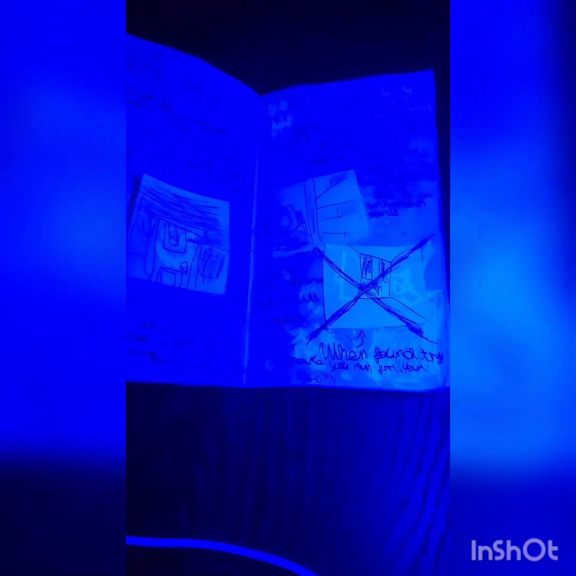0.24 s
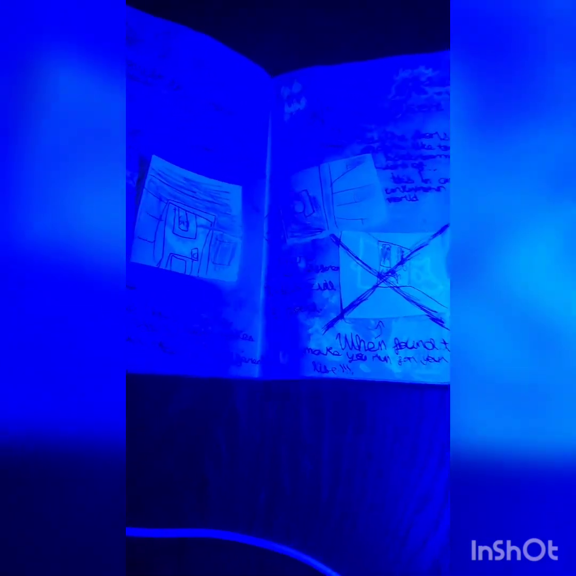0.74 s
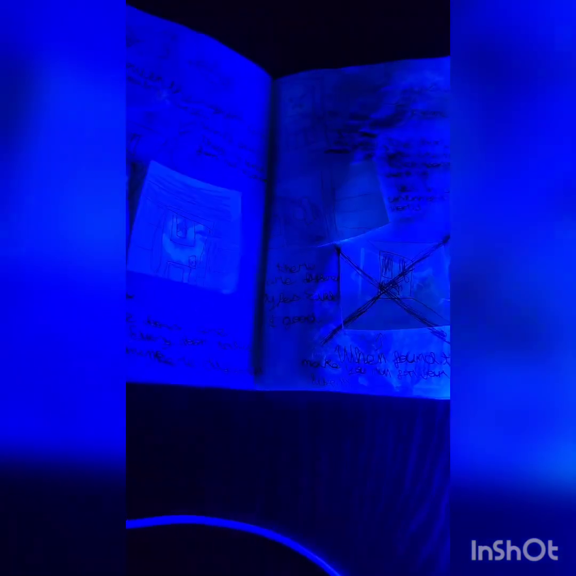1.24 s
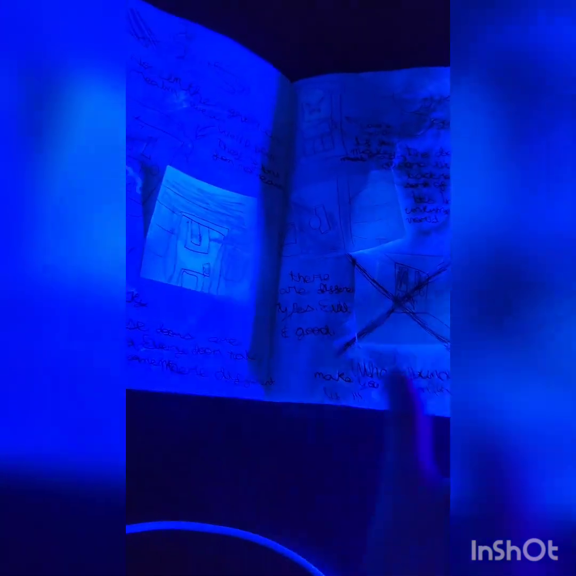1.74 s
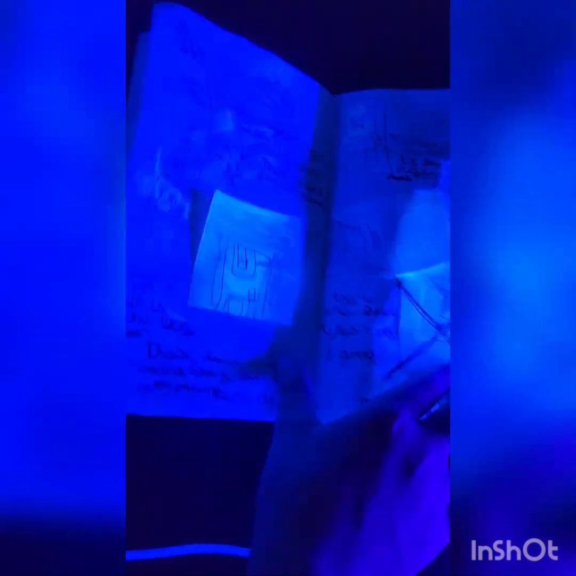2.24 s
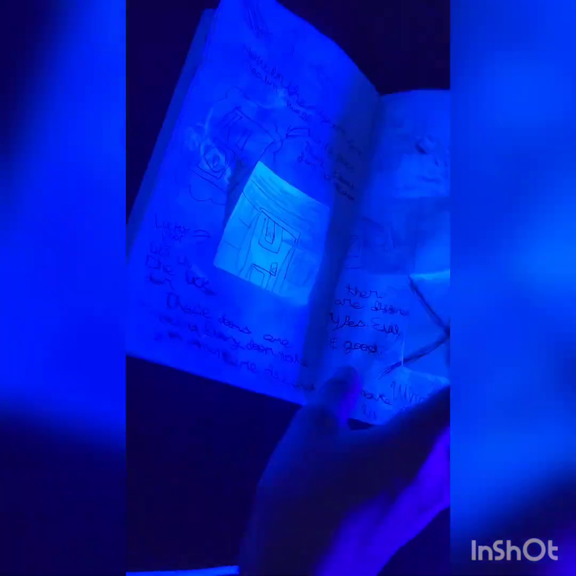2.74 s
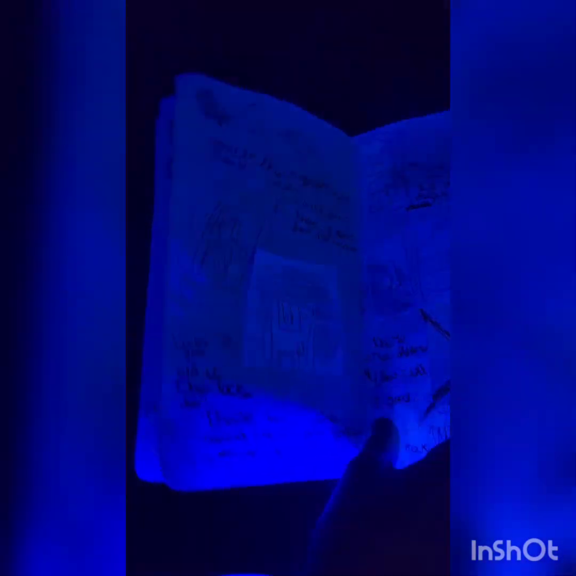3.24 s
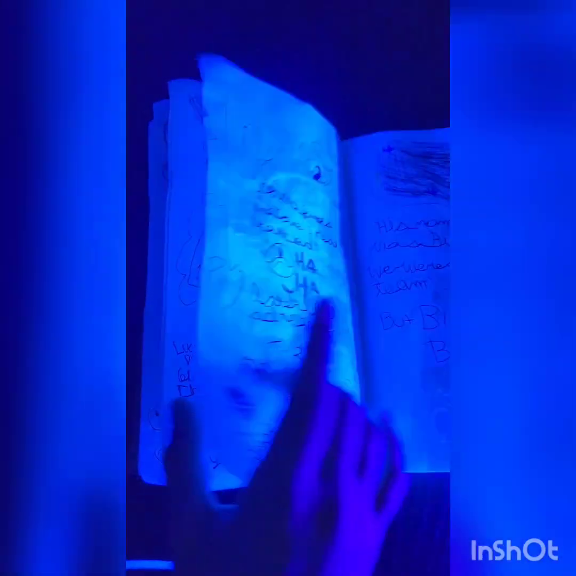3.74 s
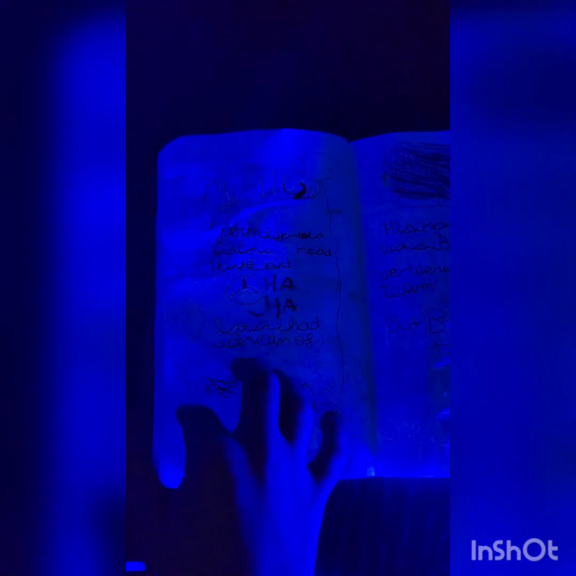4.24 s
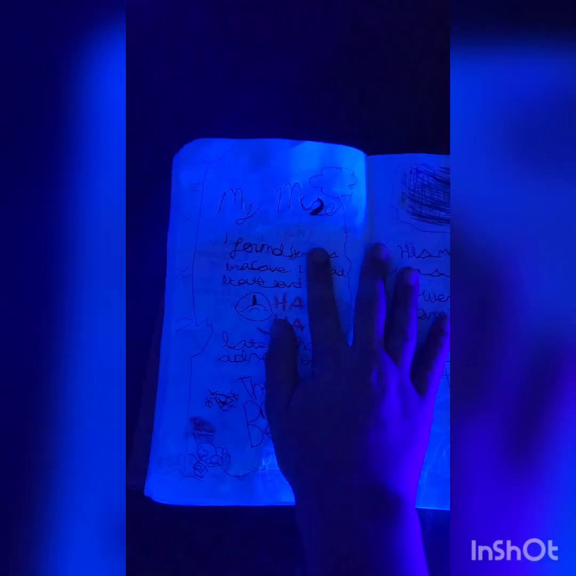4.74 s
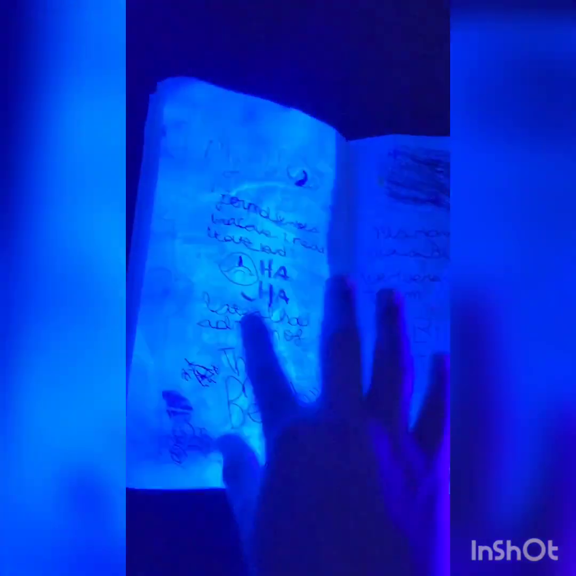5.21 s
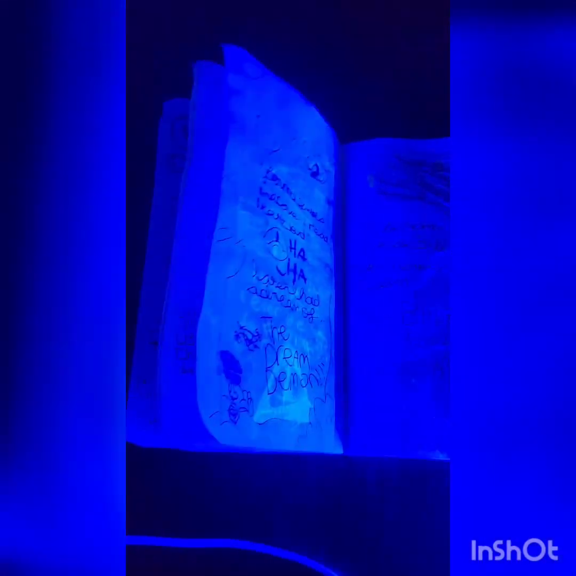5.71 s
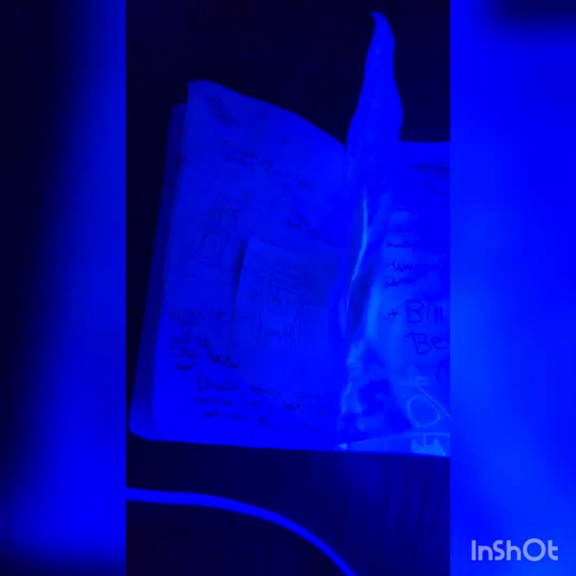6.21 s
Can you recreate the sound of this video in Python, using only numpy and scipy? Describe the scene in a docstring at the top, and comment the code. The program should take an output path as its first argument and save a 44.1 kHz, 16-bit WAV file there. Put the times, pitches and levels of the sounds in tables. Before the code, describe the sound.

A low, slightly wavering room tone opens alone. Something hard knocks and chatters near the microphone, dry and bright with short woody thuds. Heavy handmade pages are then rubbed and flipped on a table, leaning left, with crinkling, crisp creases and a soft low boom and rumble. A piercing paper snap comes past the middle; afterwards the handling thins to quiet swishes, small ticks and soft bumps in a small room.

```python
"""A thick handmade book on a table in a quiet, humming room, heard through two close microphone ports.
Over the hum, the first stiff paper snaps; then something hard nearby clacks and chatters: thuds, ringing modes, cracks.
Next a hand lifts the book, rubs and turns its pages: noise made of many slips hisses and scrapes,
and buckling creases snap and crackle. The table top booms as the book is set down, and rumbles while it is shifted.
Later the rustling and snaps grow softer, and soft bumps come near the end."""
import sys
import numpy as np
from scipy import signal
from scipy.fft import rfft, irfft, next_fast_len
from scipy.io import wavfile
from scipy.ndimage import uniform_filter1d

SR = 44100
rng = np.random.default_rng(int(sys.argv[2]) if len(sys.argv) > 2 else 0)


def gain_from_db(level_db):
    """Turn a decibel level (scalar or array-like) into a linear amplitude factor."""
    decades = np.asarray(level_db, float) / 20
    return 10 ** decades


def wav_out(sig):
    """Save sig, one row per channel (or a flat mono array), as 16-bit PCM at SR to the path in sys.argv[1]."""
    wavfile.write(sys.argv[1], SR, np.round(np.clip(np.atleast_2d(sig).T, -1, 1) * 32767).astype(np.int16))


N = 285327  # length of the sound in samples


# paper snaps: (start_s, peak_db, sheet_pitch_hz, crack_over_sheet_db, left_over_right_db)
PAPER_SNAPS = [(1.121, -38, 8100, -2, 3), (1.145, -35.5, 2270, 12, 6), (1.16, -35, 2290, 15, 9),
               (1.192, -30, 1400, 26, 8), (1.929, -45, 8000, 0, 11), (2.016, -34.5, 2680, -3, 9),
               (2.303, -28, 1165, 11, 9), (2.359, -26.5, 2720, 10, 9), (2.372, -37.5, 940, -3.5, 16),
               (2.419, -22.5, 920, 1.5, 12), (2.438, -15.5, 980, 8, 9.5), (2.45, -28, 1260, 5, 15),
               (2.487, -35.5, 940, -19, 16.5), (2.519, -26, 1620, 5, 11), (2.554, -26, 1060, 5, 14),
               (2.6, -37.5, 1030, -14, 11), (2.647, -26.5, 935, -7.5, 7), (2.67, -19.5, 1390, 5, 10.5),
               (2.702, -39, 930, -9.5, 16), (3.051, -34, 3570, -4, 3), (3.059, -26, 2280, -5, 6),
               (3.097, -34, 1360, -9, 8), (3.175, -29, 1080, 0, 5), (3.207, -29.5, 2600, -6, 4),
               (3.226, -27, 1110, -5.5, 4), (3.256, -25.5, 1560, -6.5, 1), (3.286, -18.5, 1250, 3, 5),
               (3.422, -31, 1440, -5, 2), (3.442, -22.5, 3170, -7, 3.5), (3.451, -35, 3200, 4, 4),
               (3.552, -35, 1040, -3, 0), (3.743, -47, 1830, -11, 8), (3.815, -42, 1090, -15, 19),
               (3.839, -26.5, 1800, -3, 9), (3.848, -11.5, 5700, 8.5, 5), (3.857, -29, 2620, 1, 6),
               (3.909, -35, 2380, -1, 13), (4.001, -34.5, 930, -10, 0), (4.016, -39.5, 7220, 5, 10),
               (4.264, -35, 1170, -7, 7), (4.275, -34, 5360, -9, 7), (4.295, -38.5, 900, -1, 9),
               (4.359, -32, 900, -2, 10.5), (4.394, -48, 1270, -7, 11), (4.512, -37.5, 7350, 20, 14),
               (4.554, -18, 840, 1.5, 7.5), (4.755, -22.5, 2620, 11, 6.5), (4.858, -43, 960, -4.5, 8),
               (4.942, -45, 1500, -4.5, 7), (4.993, -38, 1130, -0.5, 5), (5.072, -41, 1090, 6, 19),
               (5.12, -41, 950, -3.5, 8), (5.172, -39, 870, -2.5, 20), (5.194, -43, 880, -6, 6),
               (5.451, -38.5, 7140, 20, 13.5), (5.694, -40, 1095, -18, 8), (5.722, -47.5, 770, -11.5, 7),
               (5.927, -35, 3780, 4.5, 9.5), (6.04, -44, 2210, -23, 9), (6.13, -35, 1030, 7, 3),
               (6.151, -42.5, 1220, -18, 10), (6.198, -35.5, 730, -2, 3), (6.21, -44, 1400, -12, 4),
               (6.248, -35.5, 660, -27, 3), (6.255, -39.5, 736, -23.5, 11), (6.346, -48, 3000, -9, 8),
               (6.391, -54, 3080, -6.5, 8)]


def snaps():
    """A crease buckles: a jolt and its aftershocks ring the sheet for a few cycles under a wide crack."""
    mix = np.zeros((2, N))
    jolt = 3 * signal.unit_impulse(4000, idx=20)
    for start_s, peak_db, hz, crack_db, pan_db in PAPER_SNAPS:
        blow = jolt + burst(t60=0.018, alike=0.6, rise_s=0.0019)
        narrow = resonate(blow, hz, 0.34 * hz)
        sheet = evened(resonate(narrow, hz, 2.7 * hz))
        add(mix, start_s, peak_db, pan_db, sheet + gain_from_db(crack_db) * crack(blow))
    return mix


# colour of a sudden break: (pitch_hz, gain_db)
CRACK_COLOUR = [(200, -27), (600, -5), (1500, -4.5), (4000, -1.5), (8000, -11), (17000, -4.5)]


def crack(blow):
    """A sudden break is a very short noise spread over most pitches."""
    return coloured(blow, CRACK_COLOUR)


# colours of the fine slips, the coarse slips and the shaken sheet: (pitch_hz, gain_db)
HISS_COLOUR = [(1500, -13.5), (3000, -15), (5000, -4), (8000, -7.5), (12000, -7.5), (17000, -1.5)]
SCRAPE_COLOUR = [(800, -16.5), (1800, -10), (3000, -6), (4500, -9), (8000, -19.5), (17000, -36)]
BODY_COLOUR = [(200, -28.5), (500, -2.5), (900, 5.5), (1500, -1), (2500, -10), (5000, -54)]


def rustle():
    """Fine slips of skin and fibres hiss, coarse ones scrape, and the rarest shake the whole sheet."""
    fine = grains(per_s=900, spread_db=2.5, length_s=0.003)
    coarse = grains(per_s=400, spread_db=3.0, length_s=0.003)
    rare = grains(per_s=200, spread_db=3.5, length_s=0.0029)
    hiss = coloured(fine, HISS_COLOUR) * pressure(follows=0)
    scrape = coloured(coarse, SCRAPE_COLOUR) * pressure(follows=1)
    body = coloured(ports(rare), BODY_COLOUR) * pressure(follows=1.41)
    mix = gain_from_db(2.5) * hiss + gain_from_db(-2.0) * scrape + gain_from_db(-6.0) * body
    return mix * gain_from_db(np.array([[1.7], [-1.7]]))  # louder on the left


def grains(per_s, spread_db, length_s):
    """Noise whose loudness jumps with many small slips of unequal size, over a steady floor."""
    sizes = gain_from_db(spread_db * np.minimum(rng.exponential(1, N), 4))
    slips = (rng.random(N) < per_s / SR) * sizes
    lumps = signal.lfilter([1], [1, -np.exp(-1 / (length_s * SR))], slips)
    return (lumps + 0.66 * lumps.mean()) * rng.standard_normal((2, N))


# swells of rustling noise: strokes of hand and page, and the rattling tails of the clacks:
# (rise_until_s, fall_from_s, first_level_db, last_level_db, coarse_over_fine_db)
SWELLS = [(1.148, 1.165, -55, -57, -6.5), (1.19, 1.196, -61, -56, -6.5), (1.249, 1.431, -38, -61, 4),
          (1.492, 1.66, -64.5, -62, 9.5), (1.714, 1.895, -48, -76.5, -1), (1.928, 2.102, -68, -64.5, 1),
          (2.164, 2.181, -61, -67, 0), (2.335, 2.31, -39.5, -42.5, -2), (2.393, 2.384, -49, -54.5, 4.5),
          (2.422, 2.685, -44, -47.5, -1), (2.73, 2.885, -54.5, -51.5, -1), (2.92, 3.044, -65, -68, 1.5),
          (3.063, 3.162, -62.5, -49.5, -3), (3.184, 3.463, -47, -51, 1), (3.474, 3.565, -58, -57.5, 3),
          (3.651, 3.663, -64.5, -66.5, 1), (3.855, 3.838, -45, -30.5, 1), (3.858, 4.0, -56, -61, 2.5),
          (4.038, 4.108, -61.5, -65, -8), (4.201, 4.28, -60.5, -49.5, -7.5), (4.285, 4.386, -63, -67, 1.5),
          (4.428, 4.457, -51.5, -52.5, -3.5), (4.517, 4.562, -47, -52, -3.5),
          (4.598, 4.682, -62.5, -51.5, 2.5), (4.734, 4.779, -71, -65.5, 8),
          (4.861, 5.04, -69.5, -68.5, 4.5), (5.046, 5.209, -60, -60.5, 0), (5.239, 5.415, -52, -60.5, -14),
          (5.447, 5.57, -54, -70, -7), (5.58, 6.012, -72.5, -71.5, -0.5), (6.035, 6.113, -71, -69, 5),
          (6.13, 6.27, -72.5, -78, 13), (6.3, 6.47, -72.5, -72.5, 9)]


def pressure(follows):
    """Gain of all swells: each rises, may slide in level, and falls; the shortest overlap rise and fall."""
    rise_db_per_s, fall_db_per_s = 700.5, 483
    t, power = np.arange(0, N + 64, 64) / SR, 0  # one point every 64 samples
    for rise_until, fall_from, first_db, last_db, coarse_db in SWELLS:
        slide_db = np.interp(t, [rise_until, fall_from], [first_db, last_db])
        before_db = rise_db_per_s * np.maximum(rise_until - t, 0)
        after_db = fall_db_per_s * np.maximum(t - fall_from, 0)
        level_db = slide_db + follows * coarse_db - before_db - after_db  # follows: dB per dB of coarseness
        power = power + gain_from_db(level_db) ** 2
    return np.interp(np.arange(N) / SR, t, np.sqrt(power))


def patchy(x):
    """Fibres differ from spot to spot: narrow bands swell and sink at random."""
    z = signal.stft(x, nperseg=512)[2]
    patches = uniform_filter1d(rng.standard_normal(z.shape[1:]), size=4, axis=0)  # smooth over pitch
    patches = uniform_filter1d(patches, size=7, axis=1)  # smooth over time
    return signal.istft(z * gain_from_db(1.75 * evened(patches)), nperseg=512)[1][:, :N]


# pitches of small patches of paper: (pitch_hz)
PATCH_HZ = [810, 1130, 1700, 2500, 3600]


def crackle(per_s=16, spread_db=3.0):
    """Small creases give at random, louder as the rustling swells, each patch with its own pitch."""
    bend, mix = pressure(follows=0.84), np.zeros((2, N))
    for hz in PATCH_HZ:
        sizes = gain_from_db(spread_db * np.minimum(rng.exponential(1, N), 3))
        gives = (rng.random(N) < per_s / SR) * sizes
        tick = resonate(burst(t60=0.018, alike=0.44, rise_s=0.00042), hz, 0.55 * hz)
        mix += signal.oaconvolve((gives * bend)[None], tick / abs(tick).max(), axes=1)[:, :N]
    return gain_from_db(3.0) * mix * gain_from_db(np.array([[2.5], [-2.5]]))


# a narrow band of noise, silent because its end precedes its start: start_s, end_s, pitch_hz, width_hz, level_db
SILENT_BAND = (5.06, 5, 3500, 450, -60)


def whistle(fade_s=0.03):
    """A narrow band of noise, silent because its end precedes its start and the fade stays at zero."""
    start, end, hz, width, level_db = SILENT_BAND
    t = np.arange(N) / SR
    fade = np.clip(np.minimum(t - start, end - t) / fade_s + 1, 0, 1)
    return gain_from_db(level_db) * hum(hz, width) * fade


# hard clacks: (start_s, peak_db, thud_pitch_hz, thud_over_ring_db, strike_place from -1 to 1)
HARD_CLACKS = [(1.233, -1.5, 730, 10.5, 0.23), (1.238, -10.5, 1391, 12, .38), (1.249, -23.5, 703, 15, .3),
               (1.264, -34.5, 709, 16.5, .3), (1.281, -12, 707, 11, .3), (1.299, -23, 634, 18.5, .38),
               (1.31, -23.5, 528, 16, .3), (1.376, -30.5, 563, 3, 0.33), (1.534, -7, 1350, 16.5, 0.75),
               (1.536, -13, 731, 20, .3), (1.543, -11.5, 1277, 9.5, -0.39),
               (1.570, -12.5, 450, -6.5, -0.75), (1.579, -16, 456, -15, -0.71),
               (1.586, -21, 1200, -28, -0.13), (1.635, -22.5, 398, -14, -1.1),
               (1.642, -22.5, 1230, -22, -1.1), (1.671, -14.5, 447, 15.5, .45),
               (1.685, -13.5, 604, 1.4, 0.49), (1.694, -14, 695, -9.5, 0.69), (1.702, -12, 556, -1, 0.39),
               (1.707, -25, 1304, -7.5, 0.68)]
# modes of the hard object: (pitch_hz, width_hz, gain_db, gain_toward_strike_place_1_db)
OBJECT_MODES = [(2247, 280, -3, 1), (2617, 150, -4.5, -7), (4380, 410, -10, -2), (5330, 640, -13.5, 1.5),
                (6030, 300, -14.5, -4.5), (7710, 370, -22.5, 4.5)]


def clacks():
    """Each blow: a few low cycles, the object's modes as the strike place favours them, and a wide crack."""
    mix = np.zeros((2, N))
    for start_s, peak_db, hz, thud_db, place in HARD_CLACKS:
        crack_db = 14.5 + 0.4 * peak_db + 0.32 * thud_db  # more crack in harder, fuller blows
        blow = burst(t60=0.031, alike=0.4, rise_s=0.0014)
        t = np.arange(blow.shape[1]) / SR
        fade = gain_from_db(-60 * t * hz / 9)  # 60 dB down after nine cycles
        thud = np.sin(2 * np.pi * hz * t) * np.minimum(t / 0.00076, 1) * fade
        place = np.clip(place, -1, 1)
        ring = 0
        for mode_hz, width, gain_db, lean_db in OBJECT_MODES:
            mode = resonate(resonate(blow, mode_hz, width), mode_hz, 3 * width)
            ring = ring + gain_from_db(gain_db + lean_db * place) * mode
        sound = evened(ring) + gain_from_db(thud_db) * evened(thud) + gain_from_db(crack_db) * crack(blow)
        add(mix, start_s, peak_db, 3.5, sound)
    lag_s = 0.00019  # the clacks reach the left port later
    return np.array([np.roll(mix[0], round(lag_s * SR)), mix[1]])


# soft bumps of hand and book on the table: (start_s, peak_db, pitch_hz)
SOFT_BUMPS = [(1.885, -34.5, 204), (2.458, -25.5, 77.7), (3.183, -40, 196), (3.86, -39, 149),
              (6.012, -45, 150), (6.042, -38.5, 380), (6.099, -42.5, 470), (6.199, -40.5, 344),
              (6.211, -38.5, 443), (6.274, -63, 151)]


def bumps():
    """A soft push moves the table for one or two low cycles."""
    mix, t = np.zeros((2, N)), np.arange(3000) / SR
    for start_s, peak_db, hz in SOFT_BUMPS:
        push = np.sin(2 * np.pi * hz * t) * np.minimum(t / 0.0013, 1) * gain_from_db(-60 * t * hz / 5)
        add(mix, start_s, peak_db, 2.5, np.array([push, push]))
    return mix


# low modes of the table top: (pitch_hz, width_hz, level_db)
TABLE_MODES = [(73.6, 35, 7), (97, 20, 7), (127.3, 56, -2)]


def boom():
    """The table top booms as the book is set down and rumbles on while it is shifted, alike at both ports."""
    start_s, rise_s, shift_end_s = 2.415, 0.058, 2.99
    push, t = rng.standard_normal(N), np.arange(N) / SR - start_s
    wood = 0
    for hz, width, level_db in TABLE_MODES:
        wood = wood + gain_from_db(level_db) * evened(resonate(resonate(push, hz, width), hz, width))
    after = np.maximum(t - rise_s, 0)
    set_down = gain_from_db(-31 - 60 * after / 0.44)  # loses 60 dB in 0.44 s
    shifted = gain_from_db(-41 - 60 * after / 2.4)  # fades at 60 dB in 2.4 s until the shifting ends
    shifted = shifted * np.clip((shift_end_s - start_s - t) / rise_s, 0, 1)
    return evened(wood) * np.clip(t / rise_s, 0, 1) ** 2 * np.hypot(set_down, shifted)


# how long the room's echo lasts: (pitch_hz, time_to_fall_60_db_s)
ECHO_LENGTH = [(300, 0.34), (790, 0.33), (2090, 0.35), (5510, 0.31)]


def room(x):
    """Walls return sparse taps of random sign, each band dying at its own speed."""
    taps = np.zeros((2, SR // 2))
    at = np.arange(180, SR // 2 - 20, 20)
    at = at + rng.integers(0, 20, (2, len(at)))
    np.put_along_axis(taps, at, rng.choice([-1., 1.], at.shape), 1)
    hz, t, z = signal.stft(ports(taps), SR, nperseg=256)
    fade = gain_from_db(-60 * t / read(ECHO_LENGTH, hz)[:, None])
    tail = signal.istft(z * fade, SR, nperseg=256)[1]
    return signal.fftconvolve(x.mean(0)[None], tail / np.linalg.norm(tail[0]), axes=1)[:, :N]


# colour of room tone and microphone hiss: (pitch_hz, gain_db)
AIR_COLOUR = [(25, 2), (60, -5.5), (150, -17.5), (240, -27), (340, -22.5), (600, -24.5), (750, -40.5),
              (1150, -33.5), (1300, -45), (2200, -43), (4000, -47), (6500, -44), (9000, -47.5),
              (16500, -50)]
# fuzzy hums of the house: (pitch_hz, width_hz, level_db)
HOUSE_HUMS = [(88, 37, -59), (137.5, 24.7, -62), (196.3, 15, -67.5), (344, 69, -64), (512, 160, -67),
              (1390, 71, -82.5), (4940, 150, -90)]
# a thin hum wavers: (time_s, level_db)
THIN_HUM_LEVEL = [(0, -75), (.6, -77), (1.1, -72.5), (2.1, -72.5), (4.3, -70.5), (5.7, -69), (5.85, -62.5),
                  (6.0, -70.5), (6.47, -73)]


def room_tone():
    """Steady wide noise, narrow steady hums, a thin wavering one and the deep hum."""
    wide = gain_from_db(-50.5) * coloured(rng.standard_normal((2, N)), AIR_COLOUR)
    hums = sum(gain_from_db(level_db) * hum(hz, width) for hz, width, level_db in HOUSE_HUMS)
    thin = hum(hz=1025, width=63) * curve(THIN_HUM_LEVEL)
    return (ports(wide + hums + thin) + deep_hum()) * gain_from_db(np.array([[0.6], [-0.6]]))


def hum(hz, width):
    """A fuzzy tone: noise through a steep resonance."""
    return evened(resonate(resonate(rng.standard_normal((2, N)), hz, width), hz, width))


# the deepest hum swells and fades: (time_s, level_db)
DEEP_HUM_LEVEL = [(0.06, -45), (0.36, -60.5), (0.45, -50.5), (0.72, -47.5), (0.82, -56.5), (1.5, -60.5),
                  (1.58, -52), (1.75, -60), (2.36, -61), (2.47, -42.5), (2.85, -50.5), (3.13, -62.5),
                  (3.73, -53), (4.0, -68), (4.4, -51.5), (4.8, -51), (4.99, -66), (5.19, -46), (5.37, -57),
                  (6.1, -62), (6.47, -61)]


def deep_hum(hz=48, wander_hz=6, waver_db=2.5):
    """A low tone whose pitch and level drift at random."""
    noise = rng.standard_normal((2, N))
    drift, waver = (evened(uniform_filter1d(uniform_filter1d(v, size=3000), size=3000)) for v in noise)
    tone = np.sqrt(2) * np.sin(2 * np.pi * np.cumsum(hz + wander_hz * drift) / SR)
    return tone * curve(DEEP_HUM_LEVEL) * gain_from_db(waver_db * waver)


# likeness of the two ports: (pitch_hz, likeness from 0 to 1)
PORT_LIKENESS = [(60, 0.99), (240, 0.92), (950, 0.33), (3770, -0.0), (15000, 0)]


def ports(x):
    """Makes two unrelated signals alike in the bass, as close ports hear them."""
    size = next_fast_len(x.shape[1])
    same = np.clip(read(PORT_LIKENESS, np.fft.rfftfreq(size, 1 / SR)), -1, 1)
    left, right = rfft(x, size)
    right = same * left + np.sqrt(1 - same ** 2) * right
    return irfft(np.array([left, right]), size)[:, :x.shape[1]]


def burst(t60, alike, rise_s):
    """A short puff of noise for both ports: quick start, then a fall of 60 dB in t60 seconds."""
    t = np.arange(4000) / SR
    one, left, right = rng.standard_normal((3, len(t)))
    alike = np.clip(alike, 0, 1)
    noise = alike * one + np.sqrt(1 - alike ** 2) * np.array([left, right])
    return noise * np.minimum(t / rise_s, 1) * gain_from_db(-60 * t / max(t60, 0.004))


def resonate(x, hz, width):
    """Two-pole resonance of gain 1."""
    return signal.lfilter(*signal.iirpeak(min(hz, SR / 2.2), max(hz / width, 0.3), SR), x)


def read(points, hz):
    """Reads a table on a log-frequency axis."""
    f, value = np.transpose(points)
    return np.interp(np.log(hz + 1), np.log(f + 1), value)


def shaped(x, points):
    """Filters x along its last axis by a table of (pitch_hz, gain_db)."""
    size = next_fast_len(x.shape[-1])
    gain = gain_from_db(read(points, np.fft.rfftfreq(size, 1 / SR)))
    return irfft(rfft(x, size) * gain, size)[..., :x.shape[-1]]


def evened(x):
    """Scales to rms 1."""
    return x / np.sqrt(np.mean(x ** 2) + 1e-20)


def coloured(x, points):
    """Filters by a table and scales to rms 1."""
    return evened(shaped(x, points))


def curve(rows):
    """Gain over time from a table of (time_s, level_db)."""
    return gain_from_db(np.interp(np.arange(N) / SR, *np.transpose(rows)))


def add(mix, start_s, peak_db, pan_db, sound):
    """Lays a sound into the mix, its left-right average first scaled to the given peak."""
    part = mix[:, round(start_s * SR):][:, :sound.shape[1]]
    sides = gain_from_db(peak_db + np.array([[pan_db / 2], [-pan_db / 2]]))
    part += (sides * sound / abs(sound.mean(0)).max())[:, :part.shape[1]]


def scene():
    """Near sounds, their echo in the room, the booming table and the room tone."""
    near = snaps() + patchy(rustle()) + crackle() + whistle() + clacks() + bumps()
    return near + gain_from_db(-9.5) * room(near) + boom() + room_tone()


# tone of the microphone ports: (pitch_hz, gain_db)
PORT_TONE = [(20, -38), (35, -13.5), (48, -0.5), (6000, 2.5), (7700, 10), (8500, 4), (9100, -6),
             (10400, -5), (11500, 0), (15600, -4), (16100, -29)]


def microphone(sound):
    """The ports weaken the deepest bass, lift the upper treble, then notch it and cut off."""
    return shaped(sound, PORT_TONE)


def low_pass(x):
    """Removes everything above the highest recorded frequency."""
    return signal.sosfilt(signal.butter(12, 16480, fs=SR, output="sos"), x)


def record(dry):
    """The microphone ports colour the scene, and peaks beyond full scale clip."""
    mix = np.clip(microphone(dry), -1, 1)
    return low_pass(mix)


dry = scene()
out = record(dry)
wav_out(out)
```